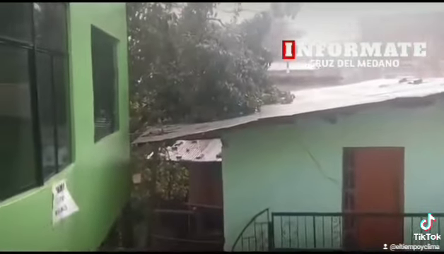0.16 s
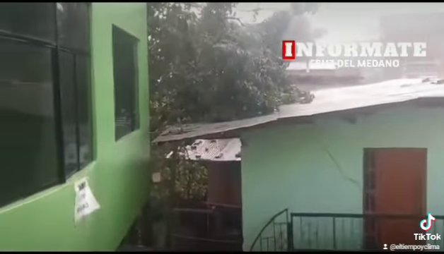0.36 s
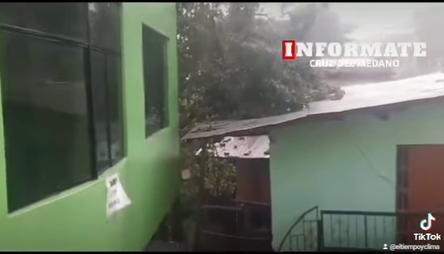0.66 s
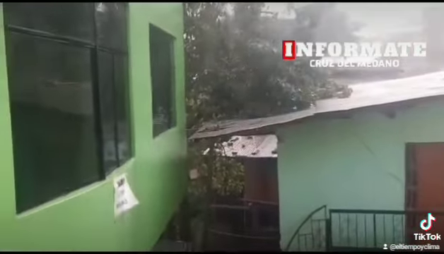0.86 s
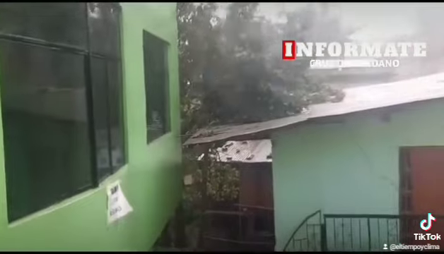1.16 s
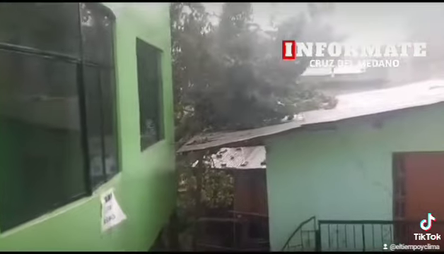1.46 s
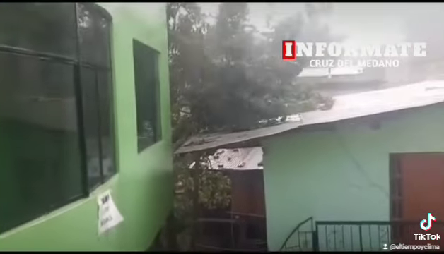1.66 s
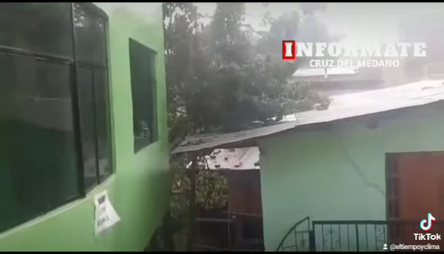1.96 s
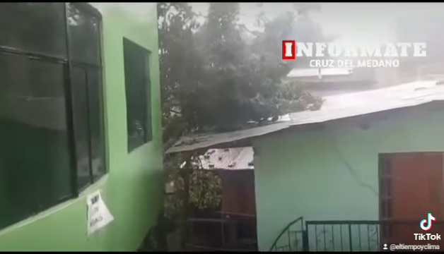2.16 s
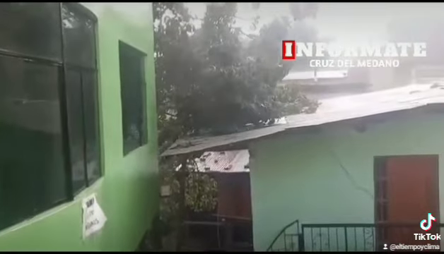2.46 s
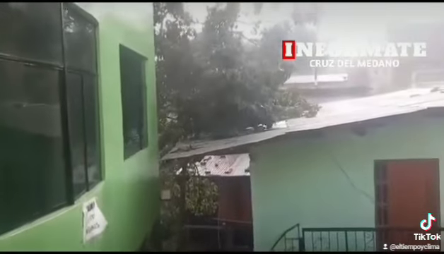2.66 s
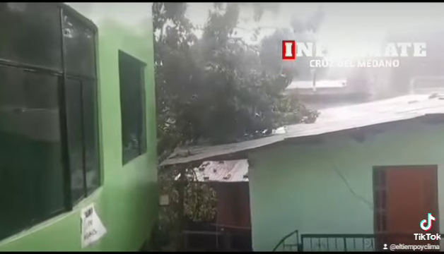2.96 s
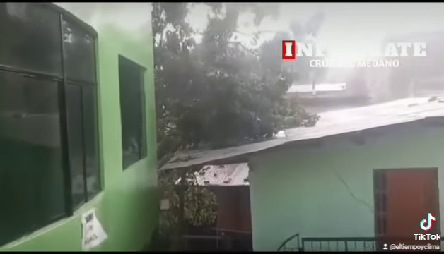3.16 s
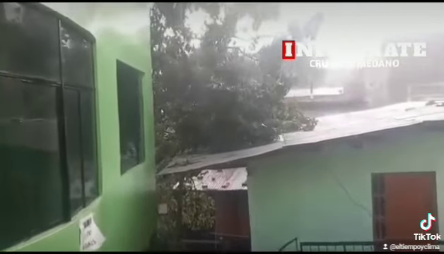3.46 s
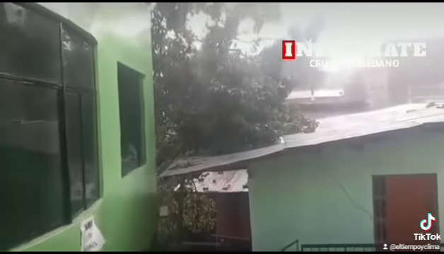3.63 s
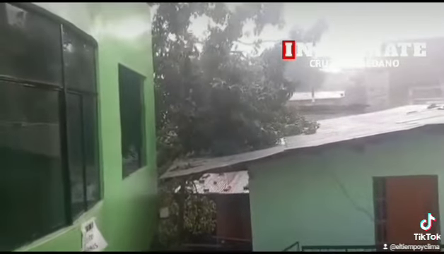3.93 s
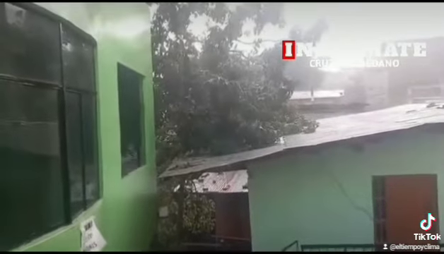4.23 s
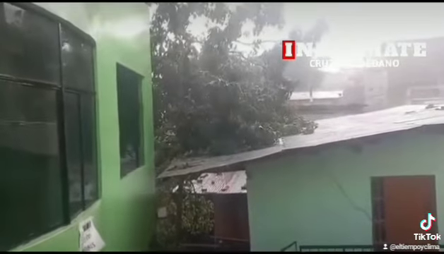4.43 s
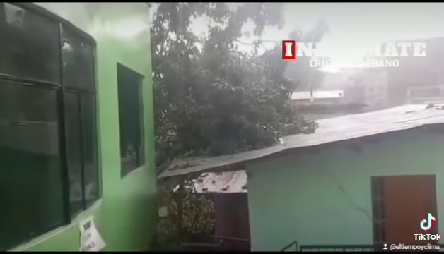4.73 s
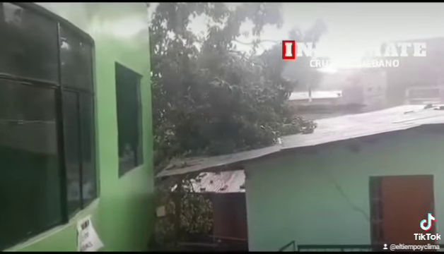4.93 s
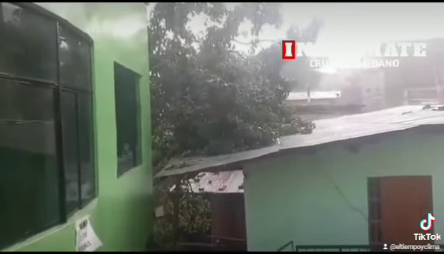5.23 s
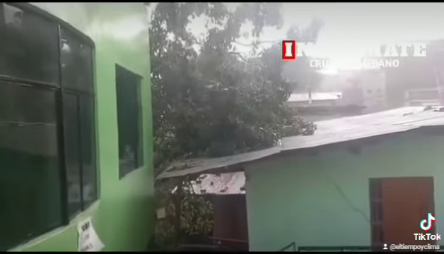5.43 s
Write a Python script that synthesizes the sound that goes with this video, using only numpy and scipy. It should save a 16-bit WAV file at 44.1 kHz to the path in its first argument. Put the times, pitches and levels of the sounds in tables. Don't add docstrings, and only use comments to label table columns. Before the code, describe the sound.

Dense, nearly mono roar of torrential rain on metal roofs around a small yard, captured by a phone under the eaves. Far drops blur into hiss, near ones ping the sheets, and fat drops tick close by. Around 3.3 seconds a hard gust thumps the microphone and the rain dips slightly; more low buffets follow to the end.

```python
import sys
import numpy as np
from scipy import signal
from scipy.fft import rfft, irfft, next_fast_len
from scipy.io import wavfile
from scipy.ndimage import uniform_filter1d

SR = 44100
rng = np.random.default_rng(int(sys.argv[2]) if len(sys.argv) > 2 else 0)


def to_linear_factor(level_db):
    exponent = np.asarray(level_db, float) / 20
    return 10 ** exponent


def materialize(psi):
    bounded = np.clip(np.atleast_2d(psi).T, -1, 1)
    quanta = np.round(bounded * 32767).astype(np.int16)
    wavfile.write(sys.argv[1], SR, quanta)


N = 246519

GAP_HZ = (7480, 8250)
TOP_CUT_HZ = 13560


def rms_one(x):
    return x / np.sqrt(np.mean(x ** 2) + 1e-20)


def in_time(rows):
    s, *columns = np.transpose(rows)
    return [np.interp(np.arange(N) / SR, s, c) for c in columns]


def coloured(x, spectrum):
    size = next_fast_len(N)
    hz = np.fft.rfftfreq(size, 1 / SR)
    point_hz, point_db = np.transpose(spectrum)
    gain = to_linear_factor(np.interp(np.log(hz + 1), np.log(point_hz), point_db))
    return irfft(rfft(x, size) * gain, size)[..., :N]


def band(x, low_hz, high_hz, order=2):
    return signal.sosfilt(signal.butter(order, [low_hz, high_hz], "band", fs=SR, output="sos"), x)


def resonance(x, hz, width_hz):
    r = np.exp(-np.pi * width_hz / SR)
    poles = [1, -2 * r * np.cos(2 * np.pi * hz / SR), r * r]
    return signal.lfilter(np.array([1, 0, -1]) * (1 - r * r) / 2, poles, x)


def drift(rate):
    r = np.exp(-80 * np.pi * rate / SR)
    slow = signal.lfilter([1], [1, -2 * r, r * r], rng.standard_normal(N // 40 + 2002))[2000:]
    return np.interp(np.arange(N) / 40, np.arange(len(slow)), rms_one(slow))


def steps(count):
    frame_s = 2048 / 48000
    frame = (np.arange(N) / SR / frame_s).astype(int)
    return rng.standard_normal((count, frame[-1] + 1))[:, frame]


def bumps(rows, order=2):
    t = np.arange(0, N + 32, 32) / SR
    swells = sum(height * np.exp(-((t - s) / half_s) ** order) for s, height, half_s in rows)
    return np.interp(np.arange(N) / SR, t, swells)


# (time [s], half-length [s], level [dB])
OPENINGS = [(0, 0.018, -52), (.54, 0.046, -54), (0.838, .04, -60), (1.05, .05, -63), (1.15, .02, -65),
            (1.303, 0.033, -55), (1.39, 0.045, -55), (1.547, .05, -59), (1.697, 0.075, -58),
            (2.06, .05, -67), (2.393, .05, -55), (2.583, 0.044, -58), (2.723, 0.022, -61),
            (2.816, 0.026, -58), (3.003, 0.046, -68), (3.168, 0.04, -53), (3.305, .04, -65),
            (3.49, .04, -62), (3.795, .08, -67), (4.04, 0.075, -58), (4.398, 0.05, -74),
            (4.919, 0.078, -59), (5.07, 0.035, -70), (5.39, 0.036, -68), (5.57, 0.028, -61)]


def gap_hiss():
    shut = to_linear_factor(-76 + 9 * drift(17))
    opened = bumps([(s, to_linear_factor(db), half_s) for s, half_s, db in OPENINGS], order=4)
    return rms_one(band(rng.standard_normal(N), *GAP_HZ, order=6)) * (shut + opened) * to_linear_factor(3)


# (frequency [Hz], density [dB per Hz])
TOP = [(8250, 1), (9500, 6), (10300, 3.5), (10800, 0), (11000, 6.5), (12500, 7), (13600, 4)]
# (start [s], end [s], frequency [Hz], left [dB], right [dB])
WHISTLES = [(0, 1.4, 10687.5, -99, -57), (1.4, 1.6, 10687.5, -57, -57), (1.4, 1.8, 11437.5, -57, -57),
            (1.4, 1.95, 8437.5, -60, -60), (1.7, 2.1, 9187.5, -58, -58), (2.42, 2.8, 9187.5, -58, -58),
            (2.8, 3.8, 9187.5, -57, -99), (3.8, 4.08, 9187.5, -59, -59), (2.42, 4.2, 9937.5, -57, -57),
            (3.8, 4.72, 11437.5, -99, -58), (5.4, 5.59, 11437.5, -60, -60), (5.38, 5.59, 9187.5, -99, -62)]
TOP_EDGES_HZ = 8250 + 750 * np.arange(8)


def stepped_top(level_db):
    t, white = np.arange(N) / SR, rng.standard_normal(N)
    room = np.ones((len(TOP_EDGES_HZ) - 1, 2, N))
    out = np.zeros((2, N))
    for start_s, end_s, hz, *sides_db in WHISTLES:
        on = slice(int(start_s * SR), int(end_s * SR))
        k = np.searchsorted(TOP_EDGES_HZ, hz) - 1
        out[:, on] += np.sqrt(2) * to_linear_factor(sides_db)[:, None] * np.sin(2 * np.pi * hz * t[on])
        room[k, np.array(sides_db) > -90, on] = to_linear_factor(-7)
    out *= to_linear_factor(2.5 * steps(count=1) - .7)

    lines, hz = rfft(rms_one(coloured(white, TOP))), np.fft.rfftfreq(N, 1 / SR)
    lines /= np.std(irfft(lines * (hz > TOP_EDGES_HZ[0]) * (hz < TOP_CUT_HZ), N))
    together, own = steps(count=1)[0], steps(count=len(room))
    high_edges_hz = np.append(TOP_EDGES_HZ[1:-1], TOP_CUT_HZ)
    for k, (low_hz, high_hz) in enumerate(zip(TOP_EDGES_HZ, high_edges_hz)):
        gain = uniform_filter1d(to_linear_factor(level_db + 1.2 * together + 2.8 * own[k]), size=200)
        out += room[k] * gain * irfft(lines * (hz >= low_hz) * (hz < high_hz), N)
    return out


# (time [s], peak [dB])
TOP_BURSTS = [
    (0.522, -46),
    (0.5601, -64),
    (1.386, -42),
    (1.6576, -38.5),
    (2.3585, -45),
    (2.388, -41),
    (2.8165, -50),
    (3.795, -54),
    (5.3697, -47),
]


def top_bursts():
    t = np.arange(N) / SR
    puff = rms_one(band(rng.standard_normal(N), 12600, 14600, order=4))
    return puff * sum(to_linear_factor(db - 9) * np.exp(-((t - s - .006) / .009) ** 2) for s, db in TOP_BURSTS)


# (time [s], peak [dB], pitch [Hz])
THUMPS = [(2.919, -19, 96), (3.064, -19.5, 93), (3.229, -17, 90.3), (3.275, -9.5, 80.8), (3.307, -24, 118),
          (3.34, -6, 84), (3.416, -12, 81), (3.572, -18, 76), (3.654, -20.5, 70.5), (4.029, -22, 80),
          (4.31, -23.5, 95), (4.597, -16.5, 81.1), (4.755, -15.5, 84), (4.823, -16.5, 70.7),
          (4.87, -18, 92.3), (4.942, -15, 67), (5.031, -14, 103), (5.114, -13, 79.7), (5.186, -15.5, 80.2),
          (5.248, -18.5, 84.2), (5.308, -18, 74.7), (5.359, -15.5, 95), (5.496, -17.5, 75.2),
          (5.555, -24, 85.2)]


def thumps():
    out, hush = np.zeros(N), np.ones(N)
    for s, peak_db, hz in THUMPS:
        near = np.arange(int((s - .06) * SR), min(int((s + .12) * SR), N))
        t = near / SR - s
        age = np.maximum(t + 0.014, 0) / 0.01
        bite = .45 * np.exp(-((t - .0015) / .0016) ** 2)
        out[near] -= to_linear_factor(peak_db) * age * np.exp(1 - age) * (np.cos(2 * np.pi * hz * t) + bite)
        hush[near] *= 1 - np.exp(-((t - .006) / 0.022) ** 4)
    return out, hush


def gain_control():
    knee_db, attack_s, return_db_per_s = -10.5, 0.053, 1.31
    starved_db, starved_s = -1.5, 0.5
    t, gain_db, top_loss_db = np.arange(N) / SR, np.zeros(N), np.zeros(N)
    for s, peak_db, _ in THUMPS:
        if peak_db > knee_db:
            pushed_db = knee_db - peak_db + return_db_per_s * (t - s)
            gain_db = np.minimum(gain_db, np.where(t > s, pushed_db, 0))
            top_loss_db += starved_db * (t > s) * np.exp(-((t - s) / starved_s) ** 4)
    return uniform_filter1d([gain_db, top_loss_db], size=int(attack_s * SR))


# (start [s], hold [s], buffet [dB], flutter re buffet [dB])
GUSTS = [(0.424, .09, -43, 3), (0.676, .08, -33.5, -23), (.88, 0.038, -35.5, -2),
         (0.983, 0.068, -36.5, -13), (1.23, 0.037, -36, -14), (1.32, 0.041, -33.5, -11),
         (1.59, 0.034, -38.5, -18), (1.77, 0.014, -31.5, -3), (2.017, 0.14, -36.5, -6),
         (2.333, 0.035, -34.5, -19), (2.92, 0.061, -21.5, -7), (3.051, 0.036, -36.5, -14),
         (3.232, 0.099, -16, -24), (3.312, 0.031, -17.5, -7.5), (3.402, 0.028, -17, -23),
         (3.48, 0.1, -25.5, -6.5), (3.642, 0.2, -31, -11), (3.848, 0.64, -40.5, -5),
         (4.03, 0.034, -28, -20), (4.275, 0.18, -34, -14), (4.57, .09, -23.5, -7.5),
         (4.768, 0.13, -23.5, -10.5), (4.92, 0.17, -21.5, -7), (5.085, .14, -20, -13.5),
         (5.272, 0.12, -24.5, -7), (5.465, 0.056, -25.5, -10)]


def gusts():
    rise_db_per_s, fall_db_per_s = 380, 199
    calm_db, calm_flutter_db = -46.5, -8
    calm_port_hz, port_sag_hz_per_db = 95, 0.93
    t = np.arange(N) / SR
    buffet, flutter = to_linear_factor(calm_db + 4.36 * drift(6.6)), to_linear_factor(calm_db + calm_flutter_db)
    for start_s, hold_s, db, flutter_db in GUSTS:
        rise_db = rise_db_per_s * np.maximum(start_s - t, 0)
        fall_db = fall_db_per_s * np.maximum(t - start_s - hold_s, 0)
        shape = to_linear_factor(db - rise_db - fall_db)
        buffet = np.maximum(buffet, shape)
        flutter = np.maximum(flutter, shape * to_linear_factor(flutter_db))
    buffet_db = 20 * np.log10(buffet)
    port_hz = calm_port_hz - port_sag_hz_per_db * (uniform_filter1d(buffet_db, size=SR // 5) - calm_db)
    return buffet_db, 20 * np.log10(flutter) - buffet_db, port_hz


# (frequency [Hz], density [dB per Hz])
FLUTTER = [(70, -28), (110, 3), (150, -0.5), (220, -5), (320, -10), (480, -13.5), (700, -46)]


def wind():
    buffet_db, flutter_db, port_hz = gusts()
    phase = 2 * np.pi * np.cumsum(port_hz * (1 + 0.08 * drift(19.5))) / SR
    lumps = np.sqrt(2) * np.sin(phase) * to_linear_factor(2.0 * drift(42) - 2.8)
    eddies = rms_one(coloured(rng.standard_normal(N), FLUTTER))
    flutter = eddies * to_linear_factor(flutter_db + 2.0 * drift(15))
    sway = rms_one(band(rng.standard_normal(N), 45, 130)) * to_linear_factor(-8)
    slaps, hush = thumps()
    return to_linear_factor(buffet_db) * (hush * (lumps + sway) + flutter) + slaps


# (time [s], peak [dB])
FAT_DROPS = [(0.5455, -10), (0.5607, -6), (0.5964, -10.5), (0.6257, -14), (0.91, -8), (1.205, -12),
             (1.3867, -5), (1.659, -11), (2.0494, -12), (2.1425, -11), (2.3702, -15), (2.388, -10),
             (2.8194, -12), (3.799, -15), (4.9494, -17), (5.369, -13)]


def fat_drops():
    t, noise, ticks = np.arange(N) / SR, rng.standard_normal(N), np.zeros(N)
    for s, db in FAT_DROPS:
        ticks[int(s * SR)] = -to_linear_factor(db + 11)
    decay_s = 0.0079
    spatter = noise * sum(to_linear_factor(db - 14) * (t > s) * np.exp(-np.abs(t - s) / decay_s) for s, db in FAT_DROPS)
    return band(ticks + spatter, 900, 5600, order=5)


def drops(per_s, spread_db):
    sizes = to_linear_factor(spread_db * np.minimum(rng.exponential(1, N), 5)) * rng.choice([-1, 1], N)
    return rms_one(sizes * (rng.random(N) < per_s / SR))


def pings():
    hits = drops(per_s=1300, spread_db=2.6)
    patch = rng.integers(0, 18, N)
    out = np.zeros(N)
    for k, hz in enumerate(np.geomspace(300, 6500, 18)):
        struck = hits * (patch == k) + 1e-18
        out += resonance(struck, hz, hz / 19.4) / hz ** 0.44
    return rms_one(out)


# (frequency [Hz], density [dB per Hz])
ROOF = [(70, -10.5), (140, -6.5), (480, -8), (960, -5), (1300, -2), (2250, -0.5), (2420, -3.5), (3000, -10),
        (3900, -8.5), (5000, -10.5), (6150, -9), (6820, -15), (6900, -16.5), (7480, -23.5)]
# (frequency [Hz], width [Hz], level [dB])
SHEET_MODES = [
    (255, 29, 2),
    (676, 79, -4),
    (1230, 310, -15.5),
    (1644, 130, -11),
    (2020, 290, -10),
]
# (frequency [Hz], width [Hz], depth [0-1])
WALL_NOTCH = (1800, 75, .62)


def rain(drum_db, splash_db, surge_db):
    hits = rng.standard_normal(N) + to_linear_factor(-11) * drops(per_s=3000, spread_db=3.0)
    hits = hits + to_linear_factor(-11) * pings()
    hits = hits + sum(to_linear_factor(db) * resonance(hits, hz, width_hz) for hz, width_hz, db in SHEET_MODES)
    hz, width_hz, depth = WALL_NOTCH
    notched = hits - depth * resonance(hits, hz, width_hz)
    sound = coloured(notched, ROOF + [(GAP_HZ[0] + 20.0, -90.0)])
    sound /= np.std(band(sound, 450, 2423, order=4))
    drum = signal.sosfiltfilt(signal.butter(3, 2900, fs=SR, output="sos"), sound)
    splash = (sound - drum) * to_linear_factor(splash_db + .35 * drift(14) + .4 * drift(4) + surge_db)
    return to_linear_factor(drum_db) * (drum * to_linear_factor(.3 * drift(10) + .4 * drift(3)) + splash)


def unlike(x, level_db):
    cells = signal.stft(x, nperseg=2048)[2]
    turns = np.exp(2j * np.pi * rng.random(cells.shape))
    return to_linear_factor(level_db) * signal.istft(cells * turns, nperseg=2048)[1][:N]


# (frequency [Hz], share [0-1])
SIDE_KEPT = [(200, .3), (280, .14), (600, .07), (1200, .04), (3000, .025), (6000, .01), (9000, .11),
             (13000, .17)]


def thin_out(mid, side):
    hz, s, cells = signal.stft(np.array([mid, side]), SR, nperseg=2048)
    starved = (hz > 6900) & (hz < 10900)
    group = np.arange(starved.sum()) // 16
    usual_db = np.interp(hz[starved][::16], [6900, 7400, 8300, 8700], [-66, -68, -70, -81])
    threshold_db = usual_db[:, None] + 3.0 * rng.standard_normal((group[-1] + 1, len(s)))
    cells[:, starved] *= np.abs(cells[0, starved]) > to_linear_factor(threshold_db)[group]
    cells[:, hz > TOP_CUT_HZ] = 0

    edges_hz = np.geomspace(210, 14000, 22)
    kept_hz, kept_share = np.transpose(SIDE_KEPT)
    share = np.interp(np.log(edges_hz), np.log(kept_hz), kept_share)
    luck = rng.random((len(edges_hz), len(s))) * .4 + rng.random(len(s)) * .6
    kept = luck < np.quantile(luck, share)[:, None]
    cells[1] *= kept[np.minimum(np.searchsorted(edges_hz, hz), len(edges_hz) - 1)]
    return signal.istft(cells, SR, nperseg=2048)[1][:, :N]


# (time [s], drumming [dB], spray re drumming [dB])
RAIN = [(0, -24, -1.5), (.4, -23.5, -1.5), (.6, -23.5, 0), (1.2, -24, 0.5), (2.1, -23, -1), (2.4, -24, .5),
        (2.75, -23.5, 0), (3.25, -24, -0.5), (3.8, -23, -0.5), (4.5, -24.5, 0.5), (4.85, -22.5, -1),
        (5.1, -24.5, -1), (5.59, -25, 0)]
# (time [s], level [dB], half-length [s])
SURGES = [(.55, 3, 0.065), (.88, -3.5, 0.036), (1.0, 0, 0.042), (1.2, -4, .04), (1.33, 0, 0.092),
          (1.53, -3, 0.035), (1.93, 3, .06), (2.05, 6, 0.017), (2.13, -4, .03), (2.37, 2, 0.02),
          (2.64, 0, .03), (2.69, -4, .02), (2.74, 4, 0.023), (2.79, -3, .02), (2.84, 3, 0.032),
          (3.26, 1.5, 0.089), (3.48, 1, 0.045), (4.11, -1, 0.019), (4.55, -4.5, 0.051), (4.83, -2, 0.033),
          (4.95, 6, 0.063), (5.05, -1, 0.024), (5.14, 5, .025), (5.19, -4, .02), (5.37, 4, 0.037),
          (5.51, -0.5, .03)]


def scene():
    drum_db, spray_db = in_time(RAIN)
    gain_db, top_loss_db = gain_control()
    surge_db = bumps(SURGES)
    gap = gap_hiss()
    core = rain(drum_db + gain_db, spray_db, 0.39 * surge_db) + wind() + fat_drops()
    top = stepped_top(-45.5 + 1.8 * spray_db + gain_db + top_loss_db + surge_db)
    yard = core + gap + top.mean(axis=0)
    mid, side = thin_out(yard, unlike(yard, -13))
    side = side + (top[0] - top[1]) / 2
    return mid + top_bursts() + side * [[1], [-1]]


def roll_off(x):
    return signal.sosfilt(signal.butter(12, 14610, fs=SR, output="sos"), x)


def record(dry):
    bass_cut = signal.butter(2, 50, "high", fs=SR, output="sos")
    mix = signal.sosfilt(bass_cut, dry)
    return roll_off(mix)


dry = scene()
out = record(dry)
materialize(out)
```